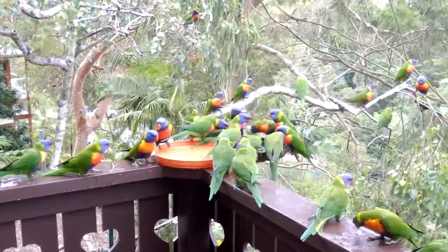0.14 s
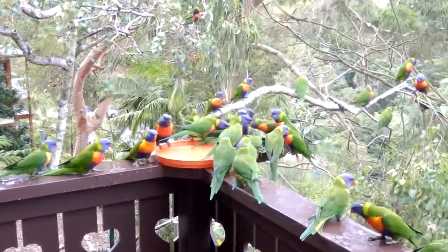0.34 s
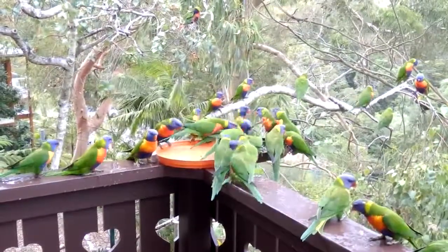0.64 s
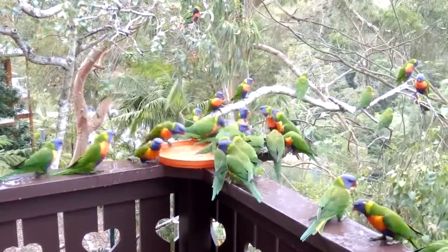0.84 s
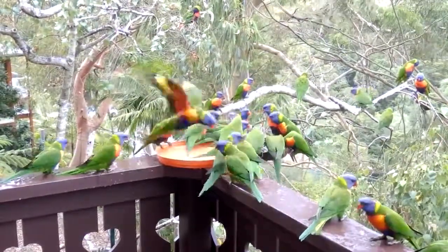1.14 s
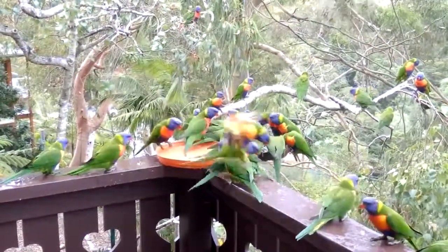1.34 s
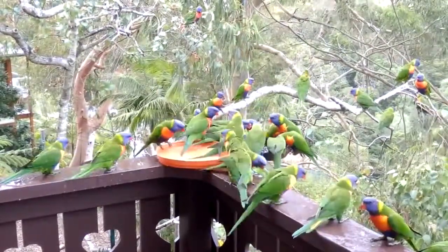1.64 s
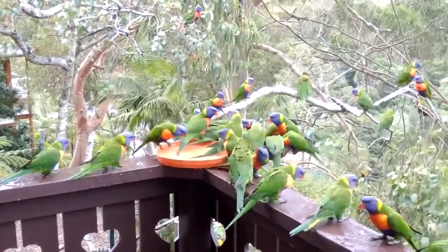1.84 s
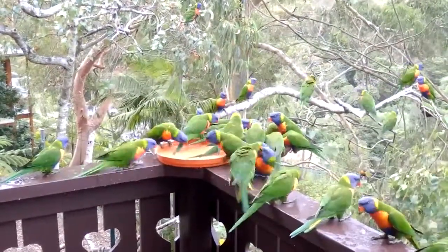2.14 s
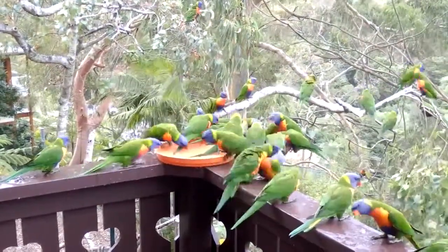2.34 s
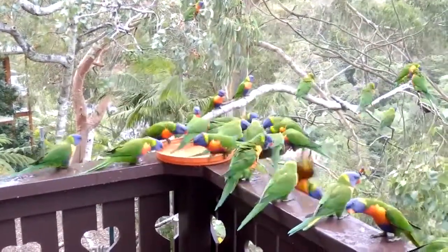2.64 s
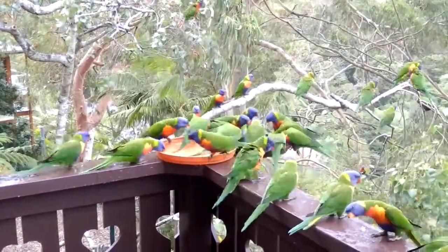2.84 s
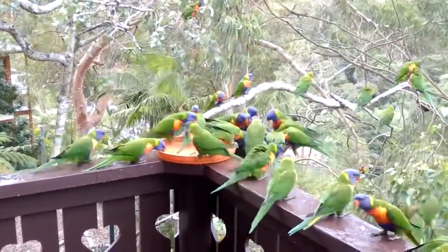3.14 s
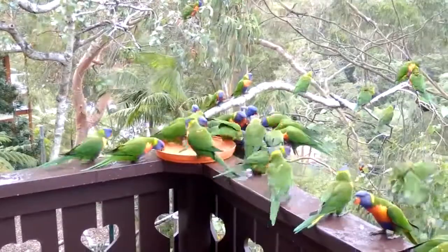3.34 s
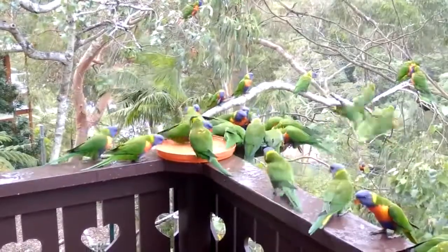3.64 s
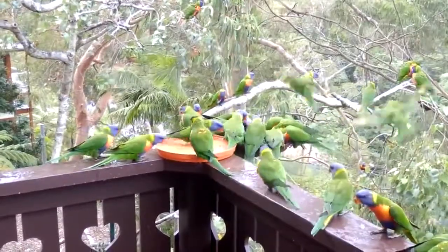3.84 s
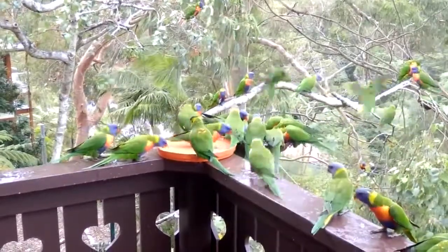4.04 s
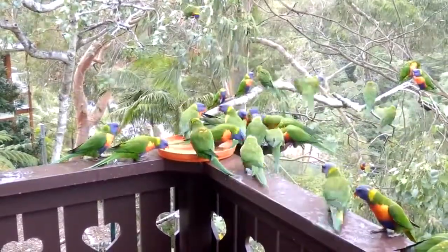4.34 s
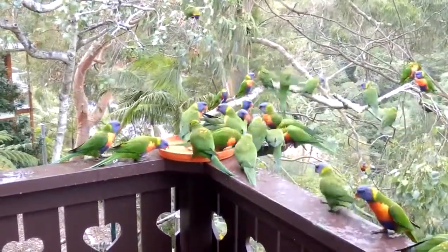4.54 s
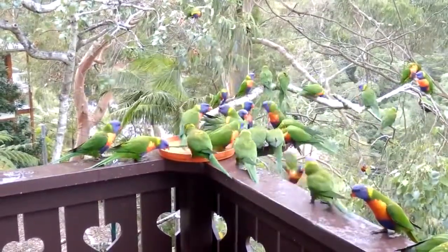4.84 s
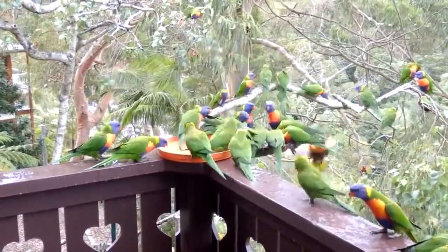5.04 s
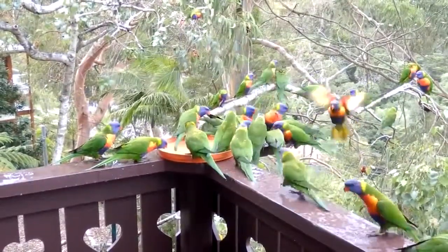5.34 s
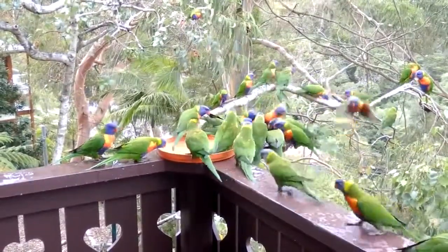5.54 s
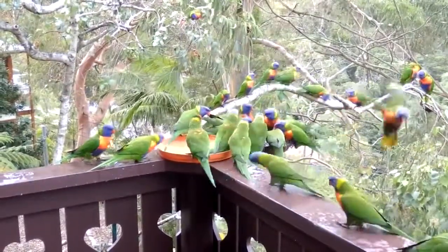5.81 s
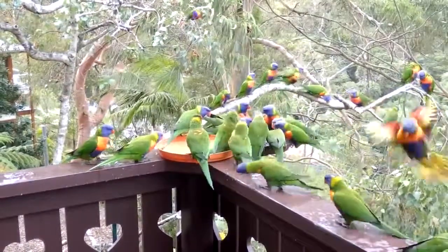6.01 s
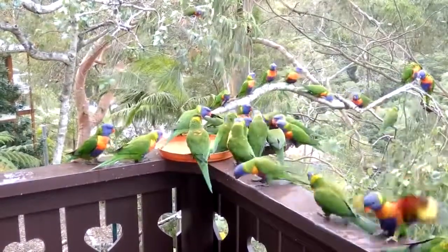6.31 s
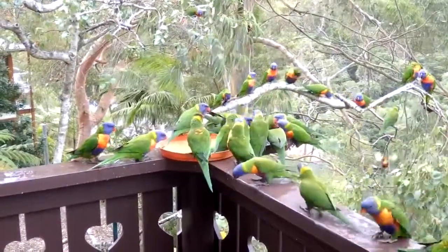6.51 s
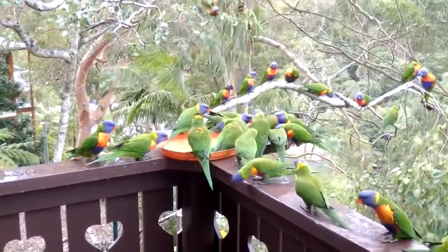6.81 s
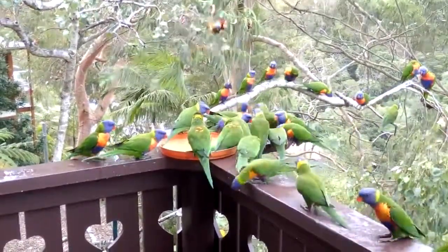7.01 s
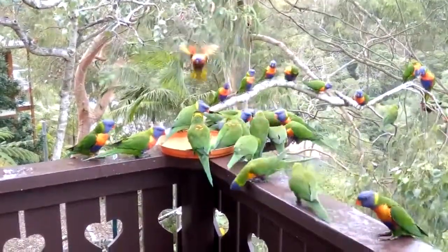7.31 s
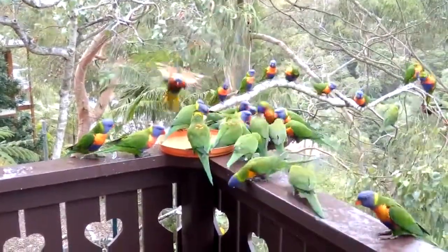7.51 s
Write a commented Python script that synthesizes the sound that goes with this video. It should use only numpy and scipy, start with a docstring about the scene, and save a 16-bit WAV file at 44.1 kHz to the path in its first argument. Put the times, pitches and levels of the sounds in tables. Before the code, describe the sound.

A flock of small parrots feeds on a wooden balcony among trees, picked up close in stereo over a soft hush of leaves and far traffic. A sharp rising whistle opens at 0 s, followed by a short gap with a light thud near 0.4 s. From 0.5 s harsh, rasping screeches overlap quick, clean whistles stepping in pitch; hollow thuds hit the rail around 1.1 and 2.1 s. Hoarse squawks from the rest of the flock fill in behind. From 2.8 to 5.3 s buzzing trilled screeches join the rough ones, with high whistles between. Dense bright chirps cluster from 5.3 to 5.8 s. Around 6 s the calls weaken and whistles turn faint, growing somewhat by 6.5 s. Bright piercing whistles burst out at 7.1-7.3 s, fade, and a harsh screech closes at 7.6 s. Short, scattered echoes trail the calls.

```python
"""A wooden balcony among trees: small parrots crowd a feeding dish, heard in stereo over the garden's hush.
A sharp whistle opens; from half a second harsh screeches overlap clean stepped whistles, beside five
thuds on the rail in the first 2.2 s. Trilled screeches join from 2.8 to 5.3 s; near 6 s whistles turn
faint; bright whistles return after 7 s and a harsh screech ends it. Whistles are near sines, screeches
rough harmonic stacks, thuds and hush shaped noise; trees and house wall scatter each call back."""
import sys
import numpy as np
from scipy import signal
from scipy.io import wavfile
from scipy.ndimage import uniform_filter1d

SR = 44100
rng = np.random.default_rng(int(sys.argv[2]) if len(sys.argv) > 2 else 0)


def store_pcm(level_fs):
    """Save levels as 16-bit WAV."""
    pcm = np.round(np.clip(level_fs, -1, 1) * 32767).astype(np.int16)
    wavfile.write(sys.argv[1], SR, np.atleast_2d(pcm).T)


N = 338247  # samples, 7.67 s


def gain_of(db):
    """Decibels to gain."""
    return 10 ** (np.asarray(db) / 20)


def evened(x):
    """Scales to rms 1."""
    return x / np.sqrt(np.mean(x ** 2) + 1e-20)


def read(points, hz):
    """Reads a spectrum on a log-frequency axis."""
    f, value = np.transpose(points)
    return np.interp(np.log(hz + 1), np.log(f + 1), value)


def add(mix, start_s, sound):
    """Mixes a two-channel sound in at a time, cut off at the end of the mix."""
    part = mix[:, round(start_s * SR):][:, :sound.shape[1]]
    part += sound[:, :part.shape[1]]


def wander(shape, hz):
    """Smooth chance of rms 1: noise low-passed at hz, so it changes about that often a second."""
    smooth = signal.butter(2, hz, fs=SR)
    return evened(signal.lfilter(*smooth, rng.standard_normal(shape)))


def edges(t, rise_s, fall_s):
    """Soft start and end, each a quarter sine."""
    nearest_edge = np.minimum((t - t[0]) / rise_s, (t[-1] - t) / fall_s)
    return np.sin(np.pi / 2 * np.clip(nearest_edge, 0, 1))


def panned(x, pan_db):
    """Places a sound by level between left and right; positive is left."""
    return np.array([x * gain_of(pan_db / 2), x / gain_of(pan_db / 2)])


# The colour of the garden's hush: freq_hz, density_db (per Hz, relative)
HUSH_SPECTRUM = [(20, -3.5), (120, 4), (800, 7.5), (2200, 4), (4000, -12.5), (7000, -9.5), (10000, -17),
                 (15500, -41)]
# Background level as the recorder's automatic gain sets it, turned down after loud calls and recovering
# slowly; this fixed curve stands in for that gain: time_s, level_db (relative)
HUSH_LEVEL = [(0, -38), (.9, -46.5), (2.2, -39), (3, -43.5), (5.1, -45), (5.8, -54), (6.6, -45),
              (7.35, -46.5), (7.67, -44)]


def hush():
    """Leaves and far traffic: patchy noise, nearly mono in the bass, its level following a fixed curve."""
    frame, hop = 1024, 256
    count, hz = N // hop + 5, np.fft.rfftfreq(frame, 1 / SR)
    a, b, c, d, patches = rng.standard_normal((count, len(hz), 5)).T
    # smoothing over frequency and time leaves soft louder and weaker patches
    patches = uniform_filter1d(patches, 10, 0)
    patches = evened(uniform_filter1d(patches, 10, 1))
    mid = a + 1j * b
    width = np.clip(hz / 4000, .1, .6)[:, None]
    side = (c + 1j * d) * width
    colour_db = read(HUSH_SPECTRUM, hz)[:, None] + 2 * patches
    noise = np.array([mid + side, mid - side]) * gain_of(colour_db)
    # the level refers to the band from 100 to 600 Hz
    band = noise[:, (hz > 100) & (hz < 600)]
    unit = np.sqrt(np.mean((abs(band) ** 2).sum(1)))
    level_db = np.interp(np.arange(count) * hop / SR, *np.transpose(HUSH_LEVEL))
    noise = noise * gain_of(level_db) / unit
    return signal.istft(noise, nperseg=frame, noverlap=frame - hop)[1][:, :N]


def garden(x, t60_s=0.2):
    """Sparse echoes of random sign from trunks and wall, different on each side."""
    length = SR // 2
    slots = np.arange(200, length - 20, 20)
    at = slots + rng.integers(0, 20, (2, len(slots)))  # one echo in every 20 samples
    taps = np.zeros((2, length))
    np.put_along_axis(taps, at, rng.choice([-1., 1.], at.shape), 1)
    tail = taps * gain_of(-60 * np.arange(length) / SR / t60_s)
    side = 0.9 * np.diff(tail[1], prepend=0)  # the sides differ in the treble, bass echoes stay central
    tail = np.array([tail[0] + side, tail[0] - side])
    tail = tail / np.linalg.norm(tail[0])
    return signal.oaconvolve(x.mean(0)[None], tail, axes=1)[:, :N]


# Feet and wings reaching the rail: start_s, level_db (of the noise burst that shakes the wood)
LANDINGS = [(0.388, -26.5), (1.086, -23.5), (1.179, -14.5), (2.035, -23), (2.129, -16)]
# Ringing tones of the wooden rail: freq_hz, level_db (relative), t60_s
RAIL = [(208.6, -2.5, 0.35), (362, -2, 1)]


def landings():
    """Feet and wings shake the wooden rail: short noise bursts ring its tones and add a low thump."""
    t, shakes = np.arange(SR // 4) / SR, np.zeros((2, N))
    for start_s, level_db in LANDINGS:
        burst = gain_of(level_db - 128 * t) * rng.standard_normal(len(t))  # dies away at 128 dB/s
        add(shakes, start_s, np.tile(burst, (2, 1)))
    ring = sum(gain_of(db - 60 * t / t60_s) * np.sin(2 * np.pi * hz * t) for hz, db, t60_s in RAIL)
    ring = ring / np.linalg.norm(ring)
    ringing = signal.oaconvolve(shakes, ring[None])[:, :N]
    thump = signal.lfilter(*signal.butter(3, [120, 650], "band", fs=SR), shakes)
    return gain_of(-19.5) * ringing + gain_of(3.5) * thump


def chatter(near, count=70):
    """The rest of the flock joins in with short hoarse squawks, louder when the near birds screech."""
    flock = np.zeros((2, N))
    for when, pitch, bend, length, size in rng.random((count, 5)):
        start_s, level_db = when * N / SR, -16 + 6 * size
        end_s = start_s + 0.029 + 0.11 * length
        start_hz = 900 + 700 * pitch
        end_hz = start_hz * (1 + .3 * (bend - .5))
        add(flock, *screech(start_s, end_s, start_hz, end_hz, level_db, level_db, bright_db=-3.5,
                            rough=0.382, trill_hz=0, release_s=0.012))
    near_level = np.sqrt(abs(uniform_filter1d((near ** 2).mean(0), 5000)))
    return flock * near_level


# How the throat colours a screech: freq_hz, level_db
THROAT = [(700, -14.5), (1200, -3.5), (2400, 1.5), (3600, -7), (5200, -7), (6600, -13.5), (9000, -22),
          (15000, -46)]
EDGE_HZ = 15800  # top of the heard band
SCOOP, SCOOP_S = .15, .005  # a screech starts this share flat and slides up to pitch with this time constant


def screech(start_s, end_s, start_hz, end_hz, start_db, end_db, bright_db, rough, trill_hz, release_s):
    """A harmonic stack with a shaking pitch; a second, slow oscillator sweeps and throbs it in a trill."""
    t = np.arange(start_s - .004, end_s + .012, 1 / SR)
    along = (t - start_s) / (t[-1] - start_s)
    order = np.arange(1, 13)[:, None]
    stack = (len(order), len(t))
    beat = 2 * np.pi * np.cumsum(trill_hz * (1 + 0.077 * wander(len(t), 40))) / SR

    shake = .075 * rough ** 2 * wander(len(t), 200) + .025 * rough * wander(len(t), 30)
    scoop = SCOOP * np.exp(-(t - t[0]) / SCOOP_S)
    hz = (start_hz + (end_hz - start_hz) * along) * (1 - scoop + shake + .055 * np.sin(beat))

    # brightness tilts the partials by so many dB per octave around 2200 Hz, within limits
    tilt_db = bright_db * np.clip(np.log2(order * hz / 2200), -.7, 1.1)
    colour_db = read(THROAT, order * uniform_filter1d(hz, 300)) + tilt_db
    # beak and tongue keep shifting the balance of the partials
    colour_db = colour_db + 2.2 * wander(stack, 14)

    # each partial breaks up on its own in strength and phase, smearing into a band
    swing, slip = 1.1 * rough * order ** .25 * wander((2, *stack), 215)
    turn = order * 2 * np.pi * np.cumsum(hz) / SR
    partials = gain_of(colour_db) * ((1 + swing) * np.sin(turn) + slip * np.cos(turn))
    partials = partials * (order * hz < EDGE_HZ)

    # each partial leans left or right by a slowly changing random amount, more in the treble
    lean = 0.53 * np.clip(order * start_hz / 2500, 0, 1) ** 2 * wander(stack, 25)
    voice = np.array([(partials * (1 + lean)).sum(0), (partials * (1 - lean)).sum(0)])
    throb = 1 + .65 * (trill_hz > 20) * np.cos(beat + .8)
    level = gain_of(start_db + (end_db - start_db) * along)
    return start_s, evened(voice * throb) * level * edges(t, .009, release_s)


# The ways a bird screeches, by name: roughness (0-1), trill_hz, release_s
VOICES = {"ragged": (1, 0, 0.049), "harsh": (0.665, 0, 0.059), "trilled": (0.41, 82, 0.058),
          "clear": (0.14, 0, 0.037)}
# Near birds' screeches: voice, start_s, end_s, start_pitch_hz, end_pitch_hz, start_level_db, end_level_db,
# brightness_db (per octave)
SCREECHES = [("harsh", .553, .65, 1350, 1300, -32.5, -12, 9.4),
             ("harsh", .778, .921, 1166, 980, -19.5, -12.5, 1.6),
             ("harsh", 0.93, 1.2, 1020, 960, -21.5, -26, -0.86),
             ("harsh", 0.95, 1.31, 1227, 1340, -14, -20.5, 7),
             ("harsh", 1.407, 1.446, 1100, 1110, -25, -10.5, -5.5),
             ("ragged", 1.45, 1.601, 850, 1000, -24, -25, 0.56),
             ("harsh", 1.63, 1.736, 980, 960, -25, -27, -10.5),
             ("harsh", 1.79, 2.159, 1700, 1300, -31, -28.5, 12.6),
             ("harsh", 2.182, 2.264, 1323, 1287, -11, -19.5, 3.2),
             ("harsh", 2.239, 2.52, 966, 906, -20.5, -21.5, -5),
             ("harsh", 2.499, 2.638, 1290, 1385, -19, -16, 3.3),
             ("trilled", 2.843, 3.033, 1250, 1393, -23, -20, -0.7),
             ("ragged", 3.07, 3.09, 1000, 1000, -19.5, -19, 3.5),
             ("trilled", 3.097, 3.178, 2000, 1500, -31, -26, 0.88),
             ("harsh", 3.44, 3.486, 1104, 1200, -28, -26, -9.5),
             ("harsh", 3.519, 3.578, 1022, 810, -26.5, -21, -11.5),
             ("trilled", 3.562, 3.795, 1270, 1404, -22.5, -14.5, 2),
             ("harsh", 3.799, 4.058, 1520, 1530, -26, -36, 3),
             ("harsh", 4.053, 4.418, 1331, 1083, -19.5, -15, -0.069),
             ("harsh", 4.452, 4.556, 1100, 884, -15, -17.5, -0.24),
             ("harsh", 4.676, 4.95, 1100, 993, -26, -16, -2),
             ("harsh", 4.954, 5.046, 730, 980, -33.5, -18.5, -6),
             ("trilled", 5.04, 5.211, 1290, 1350, -24.5, -12.5, 4.9),
             ("trilled", 5.207, 5.333, 1294, 1260, -16.5, -13, 10),
             ("harsh", 5.206, 5.335, 1200, 850, -13.5, -27.5, 1),
             ("ragged", 5.344, 5.604, 1200, 1100, -19, -20.5, 7.5),
             ("clear", 5.678, 5.738, 1297, 1285, -18, -16, 5.1),
             ("ragged", 5.762, 5.85, 1800, 1100, -51, -18, 8.8),
             ("harsh", 5.938, 6.122, 890, 1200, -32.5, -28.5, -4),
             ("harsh", 6.141, 6.329, 1162, 1098, -36.5, -29.5, 5.9),
             ("ragged", 6.347, 6.619, 1000, 1100, -27, -26.5, 0.5),
             ("harsh", 6.61, 6.811, 1050, 720, -26.5, -29, -6.5),
             ("harsh", 6.815, 6.862, 930, 800, -20.5, -32.5, -7),
             ("harsh", 6.998, 7.057, 1500, 980, -29, -41, -3.5),
             ("clear", 7.069, 7.108, 1245, 1230, -17.5, -12.5, 7.3),
             ("harsh", 7.116, 7.14, 1230, 1400, -20, -9, 6),
             ("ragged", 7.162, 7.23, 880, 1000, -22, -21.5, -1.5),
             ("harsh", 7.567, 7.681, 1064, 1119, -18.5, -19, 6.3)]


def screeches():
    """The near birds screech, each call in one of the voices."""
    near = np.zeros((2, N))
    for voice, *call in SCREECHES:
        add(near, *screech(*call, *VOICES[voice]))
    return near


def whistle(start_s, length_s, start_hz, end_hz, start_db, end_db, octave_db, pan_db):
    """A slightly unsteady membrane: a near sine, its octave, weak higher partials; soft notes waver more."""
    rise_s, fall_s = .004, .007
    t = np.arange(start_s - rise_s, start_s + length_s + fall_s, 1 / SR)
    along = np.clip((t - start_s) / length_s, 0, 1)
    wobble, flutter = wander((2, len(t)), 110)
    soft = max(start_db, end_db) < -29
    unsteady = .007 + .016 * soft  # share of the pitch
    hz = (start_hz + (end_hz - start_hz) * along) * (1 + unsteady * wobble)
    turn = 2 * np.pi * np.cumsum(hz) / SR
    tone = np.sin(turn) + gain_of(octave_db) * np.sin(2 * turn)
    for k, below_octave_db in [(3, -17), (4, -26), (5, -30)]:
        tone += gain_of(octave_db + below_octave_db) * np.sin(k * turn)
    level_db = start_db + (end_db - start_db) * along + 1.8 * flutter
    level = np.sqrt(2) * gain_of(level_db)  # the level is the rms of the fundamental
    return max(t[0], 0), panned(level * tone * edges(t, rise_s, fall_s), pan_db)


# Whistled notes: start_s, length_s, start_pitch_hz, end_pitch_hz, start_level_db, end_level_db,
# octave_db (against the fundamental), left_right_db
WHISTLES = [(0, 0.036, 2674, 3410, -9, -16.5, -15, 4.5), (0.359, 0.018, 1970, 2204, -34, -26.5, -11, -2),
            (0.406, 0.066, 2210, 2200, -35, -32, -18, 3), (0.503, 0.066, 2026, 2210, -32.5, -26, -19, -3.5),
            (0.566, 0.022, 2970, 2680, -34, -18.5, -8, -2), (0.636, 0.029, 2014, 2050, -25, -25.5, 2, 4),
            (0.667, 0.015, 2726, 2895, -14, -14.5, -6, 1.5), (0.692, 0.037, 2116, 2210, -22, -32, -0.5, 5),
            (0.704, 0.035, 2880, 3145, -14.5, -17, -2, 3), (1.308, 0.02, 3470, 3000, -22, -27, -5.5, 4),
            (1.317, 0.05, 2243, 2135, -18, -53, -3, 5), (1.457, 0.03, 2260, 2160, -26, -24, 0, 2),
            (1.498, 0.018, 3600, 2780, -21, -23.5, -6.5, 2),
            (1.516, 0.022, 2203, 2293, -22.5, -19.5, -0.5, 3),
            (1.544, 0.021, 3640, 2960, -20.5, -23, -4.5, 4), (1.563, 0.013, 2220, 2210, -15, -33, -4.5, -5),
            (1.79, 0.037, 2910, 2870, -32.5, -31, -5.5, -3), (1.812, 0.037, 4150, 3990, -32, -28, -16, -4),
            (1.84, 0.041, 3268, 3200, -23, -30.5, -1, 1), (1.876, 0.044, 2223, 2265, -25.5, -23, 8, -3),
            (1.925, 0.033, 3540, 3420, -25, -26, -5.5, -2), (1.928, 0.022, 2330, 2450, -27, -31, 2, 9),
            (1.958, 0.021, 2654, 2595, -21.5, -19.5, -1.5, 1),
            (1.965, 0.041, 3240, 3845, -22, -16, -12, -5), (1.995, 0.013, 2270, 2230, -32, -39, 18, -3),
            (2.017, 0.076, 2930, 2670, -20.5, -38, -3, -6), (2.109, 0.016, 2590, 2580, -27, -30, -14, 2),
            (2.13, 0.015, 2300, 2520, -30.5, -28, -21, 7), (2.613, .14, 1562, 1448, -28.5, -30.5, -25, 0.5),
            (2.636, 0.023, 2540, 2660, -16.5, -23, -16, -9), (2.676, 0.029, 2600, 2900, -15.5, -14, -15, 6),
            (2.746, 0.014, 3900, 3710, -27, -26.5, -16, -7), (2.768, 0.037, 2670, 2905, -24, -22, -15, -6),
            (2.804, 0.02, 4260, 4120, -36, -24, -5.5, -8), (2.834, 0.024, 3070, 3300, -28.5, -23, -1, -9),
            (2.866, 0.043, 3070, 3156, -27, -28.5, 4, -13),
            (3.088, 0.088, 3080, 3250, -33.5, -28.5, -8, -8),
            (3.168, 0.021, 3570, 3380, -27.5, -23.5, -0.5, 5),
            (3.194, 0.068, 2950, 2800, -22, -23.5, 1.5, 3.5),
            (3.277, 0.041, 3030, 2800, -18.5, -36, -8, -8.5),
            (3.801, 0.07, 3120, 3260, -28.5, -27, 1.5, -6),
            (3.887, 0.034, 4160, 4500, -20.5, -15.5, -24, -4.5),
            (3.925, 0.059, 3755, 3490, -23, -22, -21, -2), (3.99, 0.05, 3560, 3870, -24, -37, -21, -16),
            (4.43, 0.021, 2644, 2690, -29, -19.5, -11, -8), (4.563, 0.022, 2800, 3170, -23, -24.5, 4, 4),
            (4.587, 0.014, 2666, 2710, -21, -29.5, 8.5, 3),
            (4.595, 0.023, 3410, 3380, -27, -22.5, -4.5, -8),
            (4.622, 0.053, 2617, 2675, -16.5, -16.5, 4, 2),
            (4.681, 0.077, 3107, 3147, -17.5, -21, -3.5, -8),
            (5.329, 0.024, 2800, 2680, -24.5, -23.5, 4, 4), (5.37, 0.045, 2987, 3036, -19, -20, -0.5, -4.5),
            (5.439, 0.059, 2580, 2812, -22.5, -14.5, 0, 1), (5.509, 0.03, 3860, 3930, -20.5, -18, -28, 0),
            (5.51, 0.034, 2800, 2536, -23.5, -21, 2.5, 6), (5.555, 0.018, 2646, 2526, -22, -17.5, -2, 1),
            (5.588, 0.012, 2720, 2830, -17, -18, -1.5, 3.5), (5.612, 0.035, 3220, 3136, -20, -19, -2.5, 6),
            (5.736, 0.022, 2616, 2570, -25, -21, 7, 3), (5.757, 0.031, 4170, 3610, -22, -16, -11, 3),
            (5.76, 0.012, 2595, 3160, -25.5, -21, 3.5, -1), (5.785, 0.07, 3230, 3084, -30, -29.5, 6, 7),
            (5.796, 0.013, 2703, 2764, -17.5, -14, 0, 2), (5.814, 0.022, 3810, 3834, -14.5, -26, -5.5, -5),
            (5.914, 0.028, 2084, 2320, -35.5, -30.5, -2.5, 9), (6.02, 0.041, 2080, 2670, -52, -40, 1, 5),
            (6.1, .035, 2280, 2260, -51, -44, -7, 5), (6.17, .025, 2930, 3110, -37, -43, -15, 5),
            (6.193, 0.048, 2267, 2395, -36, -37, -12, 9), (6.234, 0.044, 2885, 2770, -40, -47, 4, 16),
            (6.367, 0.037, 2305, 2600, -30, -30.5, 1.5, 11), (6.413, 0.08, 2160, 2273, -32, -22, -2, 9),
            (6.512, 0.044, 2400, 2636, -31, -29.5, 1.5, 9), (6.55, 0.036, 1810, 1780, -31, -29.5, -22, 0),
            (6.554, 0.022, 2670, 2710, -27, -33, -1, -7), (6.584, 0.017, 2650, 2685, -30, -25, 1, -10),
            (6.598, 0.026, 1987, 2135, -23, -21, -18, 0), (6.929, 0.059, 2000, 1800, -37, -43, -15, 2),
            (7.143, 0.019, 2785, 2710, -18.5, -35, -5.5, -5), (7.182, 0.02, 2320, 2266, -16, -21, -15, 2.5),
            (7.201, .029, 3320, 3220, -15, -32, -16, -1), (7.23, 0.015, 3480, 3580, -11.5, -17.5, -14, -6),
            (7.244, 0.031, 2753, 2916, -17.5, -14.5, -2, -2), (7.284, 0.041, 2514, 2695, -17, -32, 2.5, 8),
            (7.387, 0.021, 2166, 2060, -38.5, -41, 4.5, 2),
            (7.424, 0.066, 2036, 2386, -44.5, -33.5, 4, -4.5),
            (7.506, 0.096, 2265, 2090, -33.5, -43, 4, -5.5)]


def whistles():
    """Clean whistled notes, stepping in pitch from one to the next."""
    notes = np.zeros((2, N))
    for note in WHISTLES:
        add(notes, *whistle(*note))
    return notes


def scene():
    """All birds, their echoes, the rail and the hush."""
    near = screeches()
    birds = near + chatter(near) + whistles()
    echoes = gain_of(-3) * garden(birds)
    return birds + echoes + landings() + hush()


def record(dry):
    """At the microphone the top treble is much weaker and high peaks are rounded off; then the band limit."""
    low = signal.firwin(301, 7750, fs=SR)[None]  # the treble steps down above 7750 Hz
    body = signal.oaconvolve(dry, low, "same")
    shaped = body + gain_of(-8.5) * (dry - body)
    shaped = shaped / (1 + shaped ** 4) ** .25
    band = signal.firwin(511, EDGE_HZ, window=("kaiser", 9), fs=SR)[None]
    return signal.oaconvolve(shaped, band, "same")


dry = scene()
out = record(dry)
store_pcm(out)
```